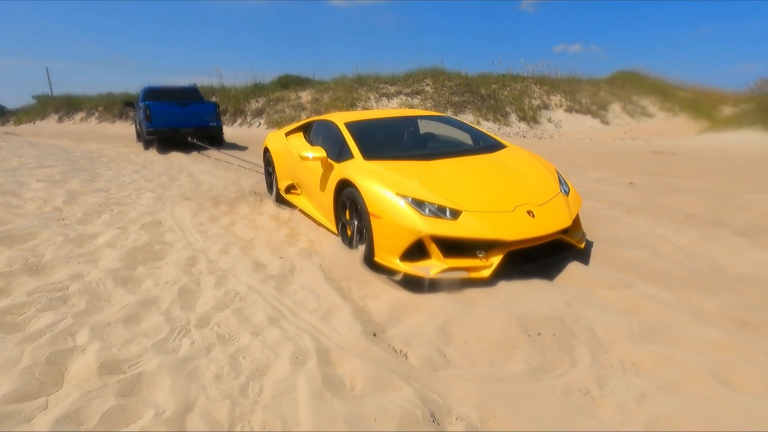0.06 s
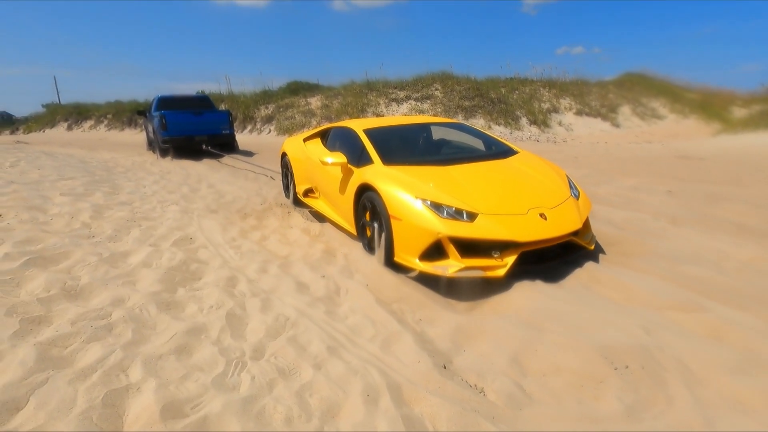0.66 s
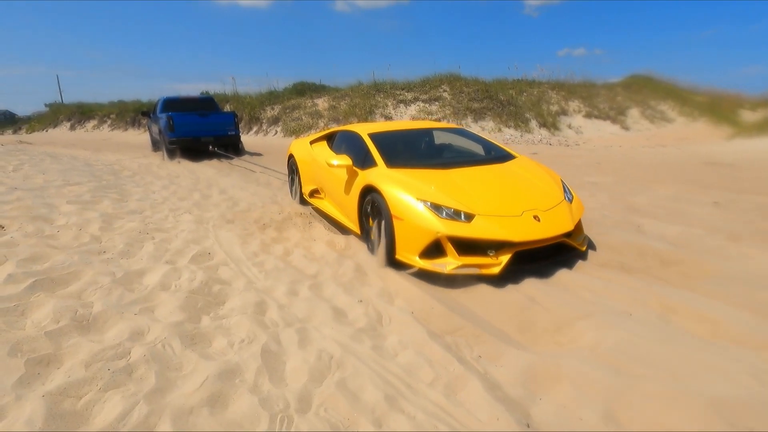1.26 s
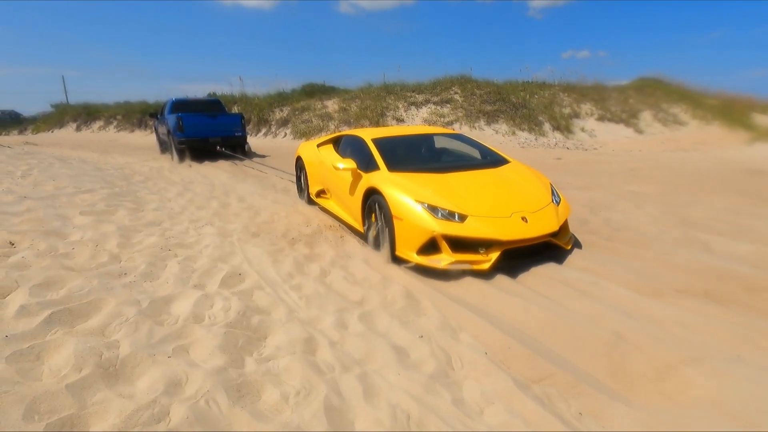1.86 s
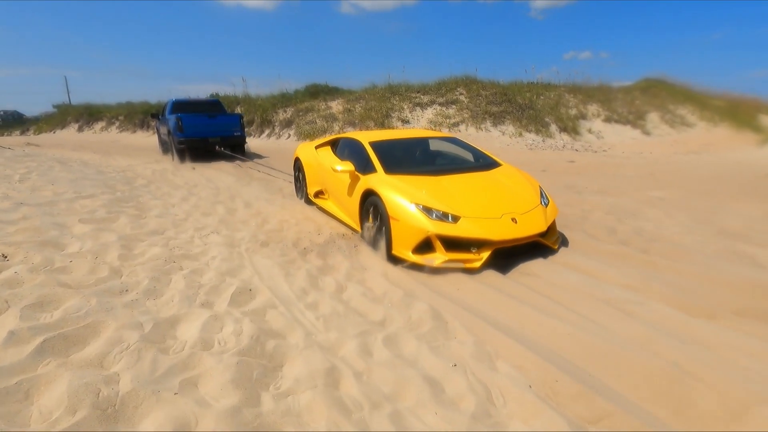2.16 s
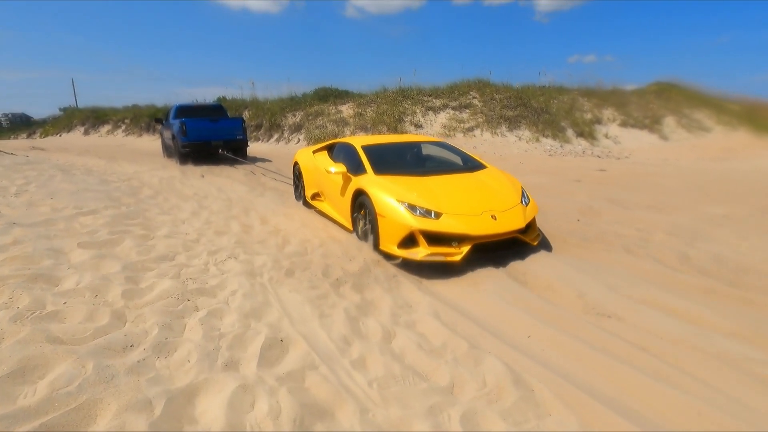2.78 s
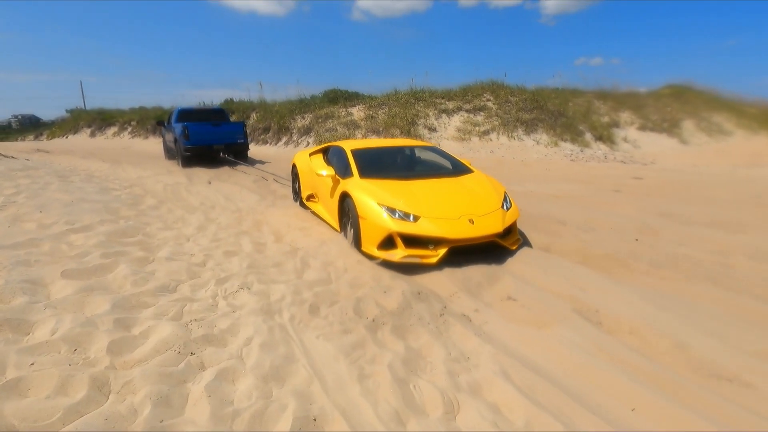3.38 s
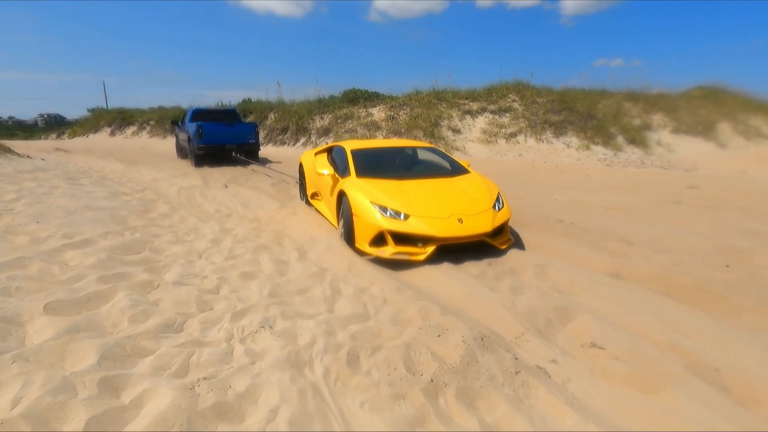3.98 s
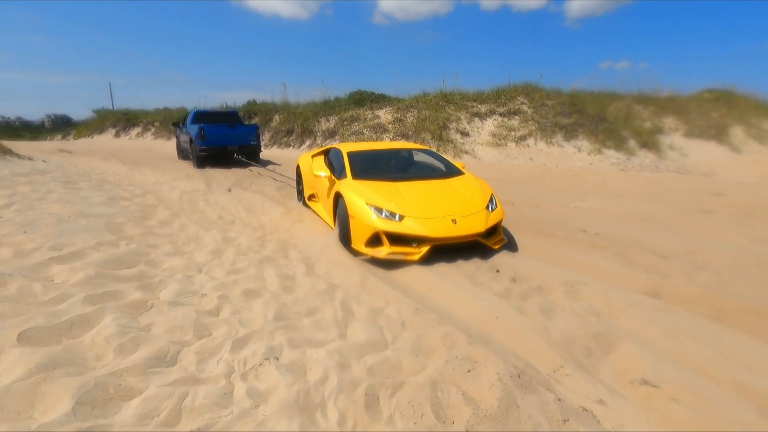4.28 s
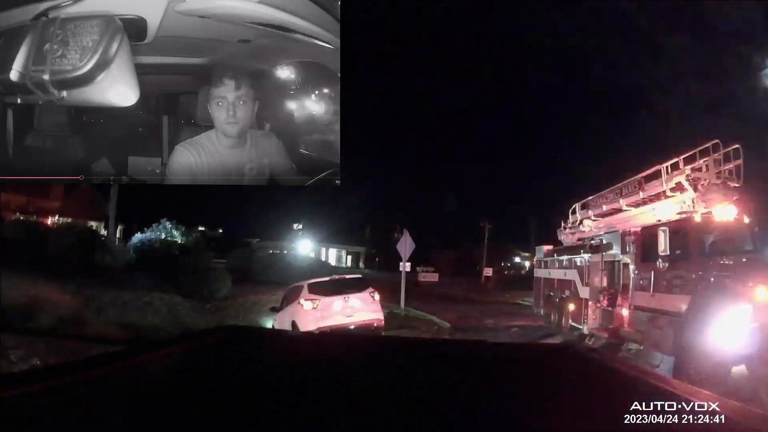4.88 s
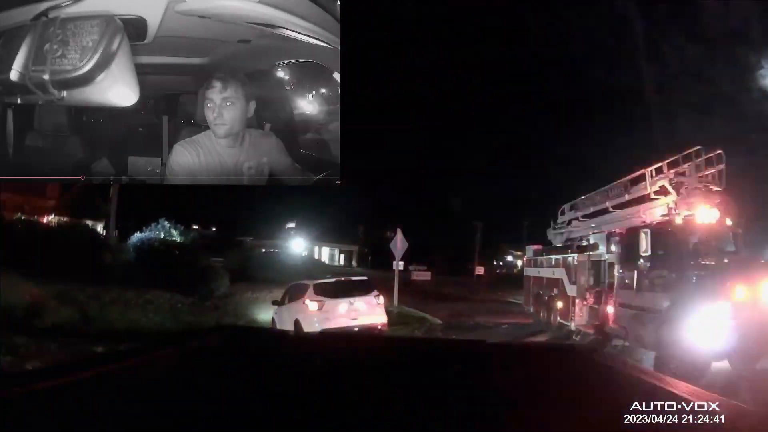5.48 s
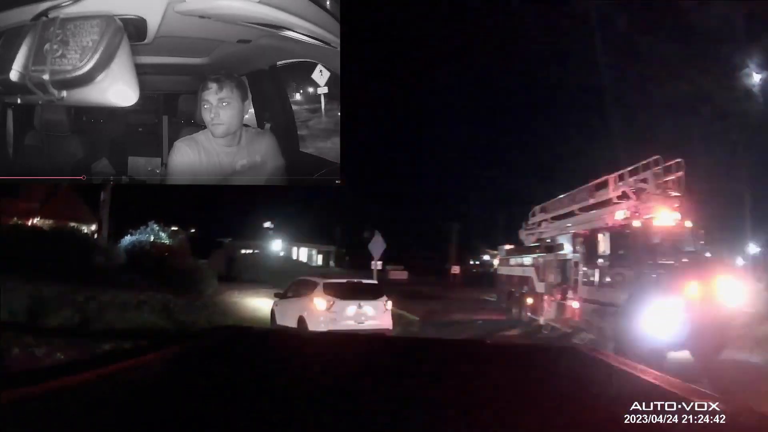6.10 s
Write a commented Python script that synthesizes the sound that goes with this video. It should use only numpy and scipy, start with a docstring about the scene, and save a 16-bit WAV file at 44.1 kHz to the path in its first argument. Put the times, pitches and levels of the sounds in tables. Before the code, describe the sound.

A loud truck engine strains at steady revs and slackens, before an abrupt switch to muffled engine hum and indicator ticks inside a vehicle.

```python
"""A V8 pickup, close to a stereo microphone, pulls hard and then eases off as it tows an idling sports
car through soft sand. Its uneven firings drone, blare and hoot in the tailpipe and shake loose metal
into a rattle; the tyres hiss and the towing gear clicks now and then. The scene then jumps to a mono
microphone in a vehicle's cabin at night: after a dull knock, the engine swells and sinks over a steady
hush, and the turn signal ticks."""
import sys
import numpy as np
from scipy import signal
from scipy.fft import rfft, irfft
from scipy.io import wavfile
from scipy.ndimage import uniform_filter1d

SR = 44100
rng = np.random.default_rng(int(sys.argv[2]) if len(sys.argv) > 2 else 0)


def unload_wav(signal):
    """Save mono or channel-first audio to the path in sys.argv[1] as 16-bit WAV at rate SR, clipped to [-1, 1]."""
    wavfile.write(
        sys.argv[1],
        SR,
        np.round(np.clip(np.atleast_2d(signal).T, -1, 1) * 32767).astype(np.int16),
    )


N = 275184
T = np.arange(N) / SR


def amp(db):
    return 10 ** (np.asarray(db) / 20)


def unit(x):
    """Scales to rms 1."""
    return x / np.sqrt(np.mean(x ** 2) + 1e-20)


def bump(x, centre, width):
    """A bell curve of height 1."""
    return np.exp(-((x - centre) / width) ** 2)


def curves(rows):
    """One value a sample for each column after the time."""
    s, *columns = np.transpose(rows)
    return [np.interp(T, s, c) for c in columns]


def colour(x, points):
    """Filters by a spectrum (f/Hz, gain/dB) drawn on a log-frequency axis."""
    hz, db = np.transpose(points)
    f = np.fft.rfftfreq(N, 1 / SR)
    return irfft(rfft(x) * amp(np.interp(np.log(f + 1), np.log(hz), db)), N)


def noise():
    return rng.standard_normal(N)


def drift(hz):
    """A slow random wander of rms 1, up to about hz."""
    f = np.fft.rfftfreq(2048, 1 / 256)
    slow = irfft(rfft(rng.standard_normal(2048)) / (1 + (f / hz) ** 4))
    return unit(np.interp(T * 256, np.arange(len(slow)), slow))


def tone(turns, shake):
    """A sine of rms about 1 whose strength wavers by the share `shake`."""
    return np.sqrt(2) * np.cos(2 * np.pi * turns) * (1 + shake * drift(6.2))


# Cabin air, all round the microphone: f/Hz, gain/dB
HUSH_SPECTRUM = [(15, 18), (60, 12.5), (200, 9.5), (270, 4), (600, 0.5), (950, -4.5), (1350, 0), (1650, -7),
                 (2000, -24.5), (2500, -23), (2950, -16.5), (3600, -28), (5100, -38), (6500, -31.5),
                 (7300, -41), (8200, -68)]
# Its course: t/s, level/dB
HUSH_LEVEL = [(4.39, -38.5), (5.05, -37.5), (5.7, -38.5), (6.24, -41.5)]
def cabin_hush():
    """A dark, steady hush that flutters slightly."""
    return amp(curves(HUSH_LEVEL)[0]) * unit(colour(noise(), HUSH_SPECTRUM)) * amp(.5 * drift(6.9))


# The engine from inside the cabin: multiple of the cycle, level/dB, resonance f/Hz, width/Hz, lift/dB
CABIN_BOOMS = [(5, -45.5, 65.4, 11, 13), (8, -55, 131, 28, 31), (9, -55.5, 160, 19, 15.5),
               (11, -40.5, 204, 8.1, 4), (12, -54.5, 212, 15, 4.5), (13, -50.5, 212, 10, 11.5),
               (16, -55.5, 274, 11, 11), (19, -61.5, 326, 8.1, 11)]
def cabin_engine(low_hz=95.5, top_hz=142.2, top_s=5.5, rise_s=1.12, release_s=5.65, sink_s=.65):
    """The firing rate climbs, levels off and sinks; orders boom as they sweep through resonances."""
    climb = 1 - np.clip((top_s - T) / rise_s, 0, 1) ** 2
    released = np.sin(np.pi / 2 * np.clip((T - release_s) / sink_s, 0, 1)) ** 2
    speed = (low_hz + (top_hz - low_hz) * (climb - released)) / 8  # eight firings a four-stroke cycle
    cycle = np.cumsum(speed * (1 + .00093 * drift(12))) / SR
    booms = 0
    for k, db, hz, width, lift_db in CABIN_BOOMS:
        level = amp(db + lift_db * bump(round(k) * speed, hz, width))
        booms += level * tone(round(k) * cycle + rng.random(), shake=.012 * k)
    return booms * amp(-4 * released)  # quieter off the throttle


# A dull knock as the cabin scene begins, then five turn-signal ticks: t/s, peak before filtering/dB, f/Hz
KNOCK_AND_TICKS = [(4.403, -32, 1112), (4.579, -34.5, 707), (4.989, -33.5, 795), (5.319, -33, 656),
                   (5.700, -34, 820), (6.080, -33, 770)]
def knock_and_turn_signal(rise_s=.0006, fall_s=.011):
    """One knock, then the signal's dull ticks: each a broad thud and a quickly damped ring."""
    out, t = np.zeros(N), np.arange(4096) / SR
    f = np.fft.rfftfreq(len(t), 1 / SR) + 1
    for s, db, hz in KNOCK_AND_TICKS:
        thud = unit(irfft(rfft(rng.standard_normal(len(t))) * bump(np.log2(f / hz), 0, .75)))
        envelope = (1 - np.exp(-t / rise_s)) * np.exp(-t / fall_s)
        hit = (np.sin(2 * np.pi * hz * t) + thud) * envelope
        out[round(s * SR):][:len(t)] += amp(db) * hit / abs(hit).max()
    return colour(out, [(1600, 1), (2200, -14), (6000, -35.5)])


# Tyres digging in, at ground level: t/s, half length/s, level/dB
SAND_SPURTS = [(2.27, 0.16, -60.5), (3.3, 0.065, -67), (4.1, 0.59, -71)]
def sand(grains_per_s=26000, spread_db=4.5, steady_db=-63):
    """Fine grains hiss and crunch under the tyres in small clumps."""
    grains = noise() * (rng.random(N) < grains_per_s / SR)
    clumps = amp(spread_db * np.tanh(drift(65)))
    level = amp(steady_db) + sum(amp(db) * bump(T, s, half_s) for s, half_s, db in SAND_SPURTS)
    crunch = colour(grains * clumps, [(1500, -14), (6000, 2.5), (9500, -10.5), (12500, -24.5)])
    return level * unit(crunch)


# The sports car, a tow's length from the truck: t/s, f/Hz, gain/dB
IDLE_COURSE = [(0, 33.27, 1), (1, 33.43, -1), (1.9, 33.12, 1), (2.2, 32.19, -1), (3.2, 32.61, 1.5),
               (4.37, 32.26, 0.5)]
# Its harmonics: multiple, level/dB
IDLE_HARMONICS = [(1, -36), (2, -33), (3, -28.5), (5, -33.5), (6, -37)]
def towed_car():
    """A steady low idle that beats against the truck."""
    hz, gain_db = curves(IDLE_COURSE)
    turns = np.cumsum(hz * (1 + .0013 * drift(12))) / SR
    idle = sum(amp(db) * tone(round(k) * turns + rng.random(), shake=.063) for k, db in IDLE_HARMONICS)
    return amp(gain_db) * idle


# Towing gear, between the vehicles: t/s, peak before filtering/dB, centre f/Hz
GEAR_CLICKS = [(0.280, -14.5, 4000), (0.385, -13, 4300), (0.437, -18.5, 2600), (0.645, -18, 4200),
               (2.734, -24.5, 2560), (2.991, -29, 2500), (3.314, -24.5, 1700)]
# The filter all its clicks share: f/Hz, gain/dB
GEAR_SPECTRUM = [(600, -8), (1300, -3), (4800, -7), (6500, -18), (12000, -34.5)]
def towing_gear(fall_s=.0026, octaves=.84):
    """Short dry clicks, each with its own brightness."""
    out, t = np.zeros(N), np.arange(2048) / SR
    f = np.fft.rfftfreq(len(t), 1 / SR) + 1
    for s, db, hz in GEAR_CLICKS:
        band = bump(np.log2(f / hz), 0, octaves)
        click = irfft(rfft(rng.standard_normal(len(t))) * band) * np.exp(-t / fall_s)
        out[round(s * SR):][:len(t)] += amp(db) * click / abs(click).max()
    return colour(out, GEAR_SPECTRUM)


def bodywork(x, echo_db=-8.5, fall_s=.012, turns_per_s=.35):
    """Close reflections off both vehicles give a fine metallic colour that shifts as they move."""
    t = np.arange(2048) / SR
    echoes = rng.standard_normal((2, len(t))) * np.exp(-t / fall_s)
    a, b = (signal.oaconvolve(x, echo / np.linalg.norm(echo))[:N] for echo in echoes)
    angle = 2 * np.pi * turns_per_s * T
    return (x + amp(echo_db) * (a * np.cos(angle) + b * np.sin(angle))) / np.hypot(1, amp(echo_db))


# The low end, near the truck: f/Hz, gain/dB
RUMBLE_SPECTRUM = [(12, -6.5), (30, 3.5), (60, -3), (130, 5), (200, -1.5), (240, -10), (380, -15),
                   (480, -18), (900, -62.5)]
def rumble(load):
    """Deep noise that thins out under load."""
    return amp(-30 - 3 * load) * unit(colour(noise(), RUMBLE_SPECTRUM))


def straining(load, onset=.45, span=.38):
    """How hard the engine labours, 0-1."""
    return np.clip((load - onset) / span, 0, 1)


def puffs(cycle, cylinders_db, rise, fall, uneven_db):
    """Envelope of the eight firings of a cycle: sharp opening, slower emptying."""
    count, age = (8 * cycle).astype(int), 8 * cycle % 1
    size_db = np.take(cylinders_db, count, mode="wrap") + uneven_db * rng.standard_normal(1024)[count]
    return unit(amp(size_db) * (1 - np.exp(-age / rise)) * np.exp(-age / fall))


# Each cylinder's tick, in firing order: gain off load/dB, gain straining/dB
CYLINDER_TICKS = [(-4, 1), (1, -7), (1.5, 3), (0, -.5), (-7, -4), (-3, 2.5), (4.5, 2), (3, 0)]
def ticking(cycle, strain, late_cycles=.04):
    """Envelope of the cylinders' ticks: sharp under load, a late, lopsided chug off load."""
    easy_db, hard_db = np.transpose(CYLINDER_TICKS)
    easy = puffs(cycle + 1 - late_cycles, easy_db, rise=.03, fall=.55, uneven_db=1.06)
    hard = puffs(cycle, hard_db, rise=.012, fall=.35, uneven_db=1.77)
    return np.sqrt((1 - strain) * easy ** 2 + strain * hard ** 2)


# The truck's tailpipe and panels: f/Hz, width/Hz, lift/dB
METAL_MODES = [(1010, 120, -4), (1236, 110, 4), (1465, 50, -6), (1595, 170, 4), (1815, 58, -8.5),
               (2086, 150, 4), (2455, 43, -3.5), (2914, 580, 3.5), (3800, 40, -4.5)]
def metal_ring(x):
    """Narrow metallic resonances ring on after each tick, with hollows between them."""
    f = np.fft.rfftfreq(N, 1 / SR)
    response = amp(sum(db / (1 + 2j * (f - hz) / width) for hz, width, db in METAL_MODES))
    return irfft(rfft(x) * response, N)


def rattle(clatter, per_s=420, fall_s=.0038, spread_db=3.5, low_hz=1188, high_hz=5490, parts=32):
    """The firings shake loose many small metal parts, each with a short ping of its own."""
    out, t = np.zeros(N), np.arange(1500) / SR
    starts = np.flatnonzero(rng.random(N) < per_s * clatter ** 2 / SR)
    gains = amp(spread_db * np.minimum(rng.exponential(1, len(starts)), 2))
    part_hz = np.geomspace(low_hz, high_hz, parts) * rng.uniform(.98, 1.02, parts)
    for i, gain, hz in zip(starts, gains, rng.choice(part_hz, len(starts))):
        ping = gain * np.sin(2 * np.pi * hz * t) * np.exp(-t / fall_s)
        out[i:i + len(t)] += ping[:N - i]
    return unit(colour(metal_ring(out), [(1200, 3.5), (3300, .5), (5400, -5.5)]))


# The top end, near the truck: f/Hz, gain/dB
HISS_SPECTRUM = [(1800, -25), (3000, 4), (3500, 4), (4700, 2), (5600, -3.5), (6200, -11), (7200, -12.5),
                 (9500, -27.5), (13000, -54.5)]
def hiss(clatter):
    """A sharp spit of noise at every firing."""
    spit = noise() * np.hypot(clatter, .55)
    return unit(metal_ring(colour(spit, HISS_SPECTRUM)))


def pipe_ring(cycle, size=1024):
    """A dense ring that repeats each cycle: all multiples equally strong, in random phase."""
    shape = irfft(np.exp(2j * np.pi * rng.random(size // 4)), size)
    return unit(np.interp(cycle * size, np.arange(size), shape, period=size))


# The upper mids, near the tailpipe: f/Hz, gain/dB
RASP_SPECTRUM = [(250, -36.5), (600, -9), (900, -19), (1040, 1), (1270, 4.5), (1830, 1), (2200, 1.5),
                 (3000, 0), (3700, -6.5), (5000, -23.5), (12000, -67.5)]
def rasp(pipe, clatter, load):
    """Noise and pipe ring pulse with the ticks; load brings the ring forward."""
    air = noise() + (.3 + load) * pipe
    return unit(metal_ring(colour(air * np.hypot(clatter, .7), RASP_SPECTRUM)))


# Hoots at the tailpipe: place/cycles, f/Hz, half length/s, level off load/dB, level straining/dB
PIPE_HOOTS = [(0.109, 588, .003, -48, -35.5), (.31, 794, 0.0051, -46, -39),
              (0.664, 890, .003, -56.5, -35.5), (0.921, 850, .004, -39.5, -38.5)]
def hoots(cycle, speed, strain, stray_cycles=.003, waver=.025):
    """The strongest puffs sound short hollow hoots in the pipe, regular under load, ragged off load."""
    out = 0
    for place, hz, half_s, easy_db, hard_db in PIPE_HOOTS:
        stray = (1 - strain) * stray_cycles * drift(12)
        age = ((cycle - place + stray + .5) % 1 - .5) / speed
        pitch = hz * (1 + (1 - strain) * waver * drift(10))
        db = easy_db + strain * (hard_db - easy_db) + 1.8 * drift(8)
        out += amp(db) * bump(age, 0, half_s) * np.cos(2 * np.pi * pitch * age)
    return out


# Each cylinder's puff in firing order, louder from the bank nearer the microphone: gain/dB
CYLINDER_PUFFS = [3, 3, 1, 2, -7.5, 1, 4.5, -2]
# The mids, near the tailpipe: f/Hz, gain/dB
BLARE_SPECTRUM = [(350, -29), (440, 6.5), (500, -7.5), (580, 4.5), (660, 3.5), (730, -3.5), (810, 4.5),
                  (900, 3.5), (1010, -8.5), (1250, -15), (2200, -29.5), (3500, -47.5)]
def blare(cycle, pipe, load):
    """Under load the pipe answers each cycle alike and keeps clean lines; off load it turns breathy."""
    gate = puffs(cycle, CYLINDER_PUFFS, rise=.03, fall=.6, uneven_db=1.5) + .33
    lines, breath = (unit(colour(air * gate, BLARE_SPECTRUM)) for air in (pipe, noise()))
    clean = .25 + .75 * straining(load)
    return amp(-44.5 + 4 * load ** 2) * (np.sqrt(clean) * lines + np.sqrt(1 - clean) * breath)


# Exhaust orders at the tailpipe: multiple of the cycle, level off load/dB, level straining/dB
EXHAUST_ORDERS = [(3, -39, -34.5), (5, -30, -37), (9, -41.5, -36.5), (10, -42.5, -44.5), (11, -29.5, -31.5),
                  (12, -41.5, -53), (13, -33, -35), (14, -41, -49), (15, -55, -36), (16, -48, -35.5),
                  (17, -47, -34.5), (18, -54, -46.5), (19, -43.5, -35.5), (20, -43.5, -46.5),
                  (21, -55.5, -48.5), (22, -49, -51), (23, -50.5, -51.5), (24, -53, -50.5),
                  (26, -49.5, -48), (27, -51, -47.5), (30, -54, -48.5), (33, -57, -47), (34, -64, -49.5),
                  (42, -65.5, -52), (46, -56.5, -46.5), (49, -61, -48), (58, -65.5, -53.5),
                  (66, -65.5, -54)]
# The pipe's resonances and hollows: f/Hz, width/Hz, lift/dB
PIPE_MODES = [(233.6, 11.5, -10.5), (266.4, 9.9, 6.5), (324.4, 13.4, 4.5), (371, 20, 5), (436, 22, 4),
              (707, 33, -9.5), (810, 33, 5.5)]
# The firing tone, eighth order: t/s, level/dB
FIRING_LEVEL = [(0.0, -17), (0.15, -15.5), (1.54, -16), (1.92, -21), (2.74, -22), (2.9, -30.5),
                (3.33, -21.5), (3.9, -25.5), (4.3, -22.5)]
def exhaust_drone(cycle, speed, load, shake_per_order=.0061):
    """Unequal cylinders add orders around the firing tone; each swells crossing a pipe resonance."""
    lead = np.angle(np.fft.fft(amp(CYLINDER_PUFFS))) / (2 * np.pi)
    lag = (1 - load) / 2 + load / 6  # the shape of the pulses turns over as the load drops
    shake = .017 * load + .026 * (1 - load)
    f = np.arange(1200)
    lift = sum(lift_db * bump(f, hz, width) for hz, width, lift_db in PIPE_MODES)
    strain, orders = straining(load), 0
    for k, easy_db, hard_db in EXHAUST_ORDERS:
        k = round(k)
        db = easy_db + strain * (hard_db - easy_db) + np.interp(k * speed, f, lift)
        scatter = rng.random() * (k > 20) + .075 * (k / 46) ** 2 * drift(6)  # high orders stray in phase
        turns = k * cycle + lead[k % len(lead)] - lag + scatter
        orders += amp(db) * tone(turns, shake + shake_per_order * k)
    return orders + amp(curves(FIRING_LEVEL)[0]) * tone(8 * cycle - lag, shake=.02)


# The pickup's four-stroke cycle rate: t/s, f/Hz
ENGINE_SPEED = [(0.0, 18.5), (0.33, 19.1), (0.58, 19.3), (1.01, 19.18), (1.63, 18.4), (1.81, 18.0),
                (1.98, 17.26), (2.2, 16.68), (2.49, 16.6), (2.7, 16.08), (3.01, 15.27), (3.4, 15.88),
                (3.72, 15.56), (4.36, 15.86)]
# Its pull through the sand: t/s, load/0-1
ENGINE_LOAD = [(0, 0.78), (1.5, 0.73), (1.95, 0.42), (2.55, 0.41), (2.95, 0.11)]
# Its rasp: t/s, level/dB
RASP_LEVEL = [(0.0, -45.5), (0.3, -43.5), (1.53, -45.5), (2.98, -43.5), (4.16, -39.5), (4.3, -40.5)]
def truck(rattle_db=-6):
    """The V8 from close by: one firing cycle drives the exhaust and the rattle, over a low rumble."""
    speed, load = curves(ENGINE_SPEED)[0], curves(ENGINE_LOAD)[0]
    strain = straining(load)
    surge = uniform_filter1d(np.gradient(speed) * SR, size=SR // 5)  # speed gained, Hz/s
    cycle = np.cumsum(speed * (1 + .0005 * drift(12))) / SR
    drone = exhaust_drone(cycle, speed, load)
    pipe, clatter = pipe_ring(cycle), ticking(cycle, strain)
    rasp_level = amp(curves(RASP_LEVEL)[0])
    hiss_level = amp(-55 + load * (12 + 2.5 * surge))
    rattle_level = amp(rattle_db) * np.hypot(rasp_level, hiss_level)
    upper = rasp_level * rasp(pipe, clatter, load) + hiss_level * hiss(clatter)
    upper += rattle_level * rattle(clatter)
    upper = bodywork(upper) * amp(.5 * drift(8.2))  # the treble flutters a little
    return rumble(load) + upper + hoots(cycle, speed, strain) + blare(cycle, pipe, load) + drone


# Stereo width at the outdoor microphone: f/Hz, side against mid/dB
BEACH_WIDTH = [(30, -21.5), (120, -32.5), (500, -21.5), (2000, -12), (5000, -13.5), (11000, -7)]
def scene(cut_s=4.372):
    """The beach, slightly wide and brighter on the left, then the cabin in mono."""
    beach = truck() + towed_car() + sand() + towing_gear()
    lean = colour(beach, [(100, -40), (500, -51.5), (1500, -22), (4000, -18.5)])
    side = lean + colour(np.roll(beach, round(.011 * SR)), BEACH_WIDTH)
    cabin = cabin_hush() + cabin_engine() + knock_and_turn_signal()
    inside = .5 + .5 * np.tanh((T - cut_s) / .0015)
    return (1 - inside) * np.array([beach + side, beach - side]) + inside * cabin


def record(dry, edge_hz=13200):
    """Both microphones pass through one steep low-pass."""
    lowpass = signal.firwin(511, edge_hz, window=("kaiser", 9), fs=SR)
    return signal.oaconvolve(dry, lowpass[None], "same")


dry = scene()
out = record(dry)
unload_wav(out)
```